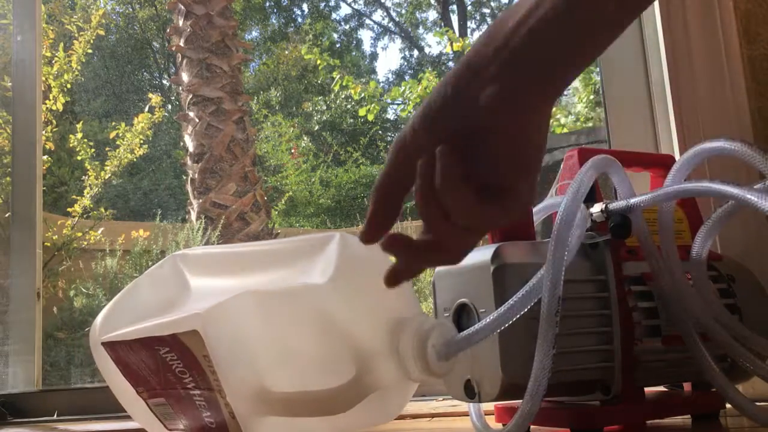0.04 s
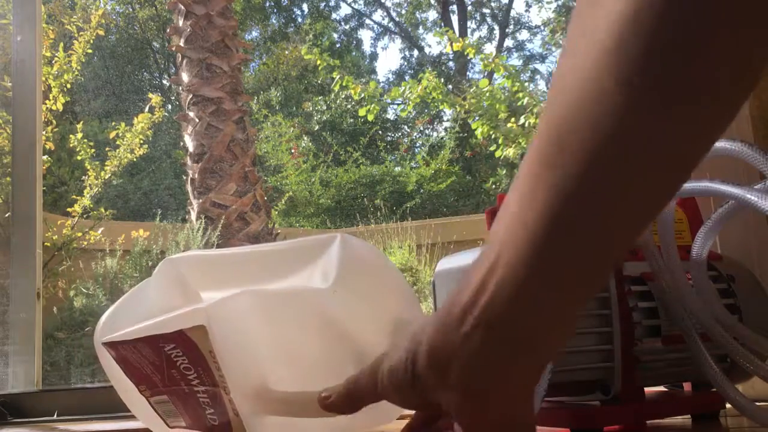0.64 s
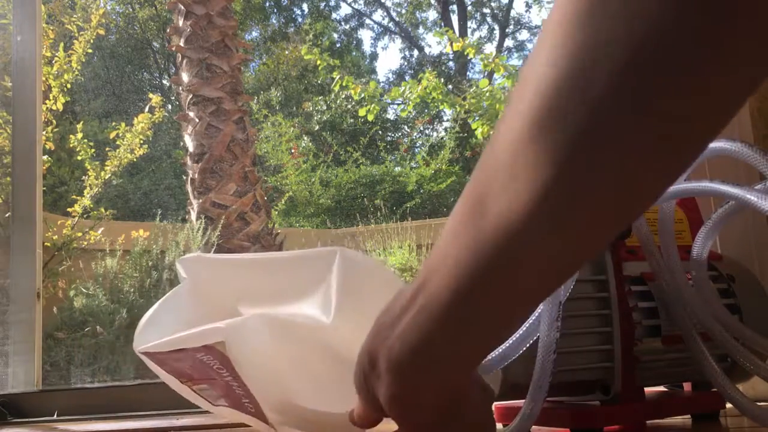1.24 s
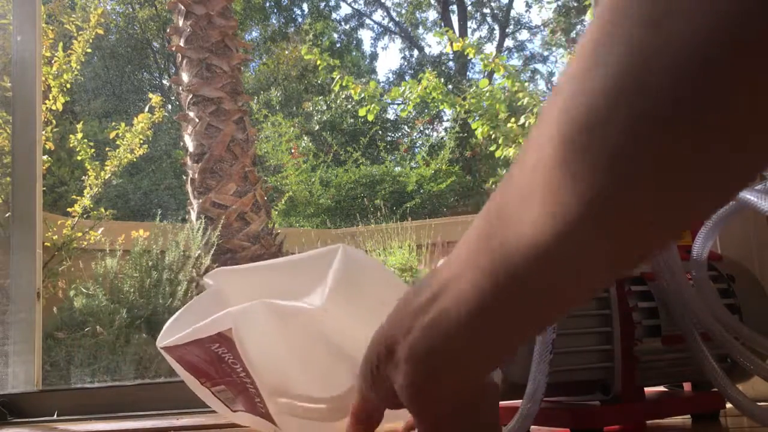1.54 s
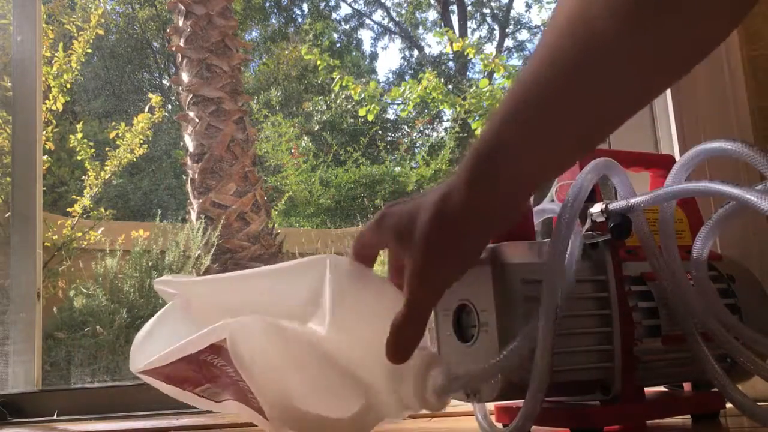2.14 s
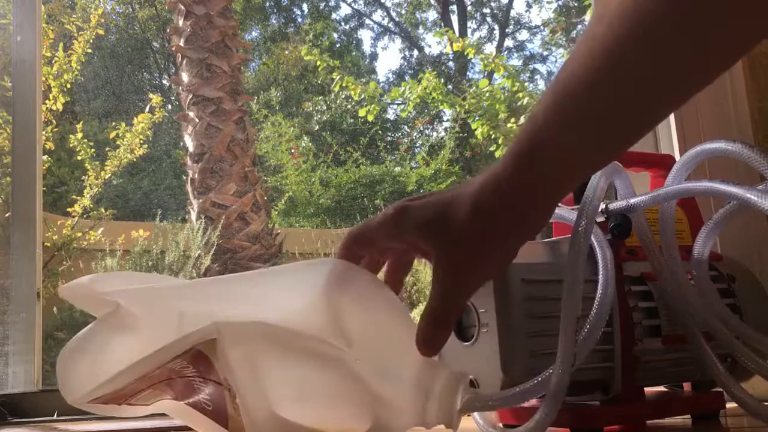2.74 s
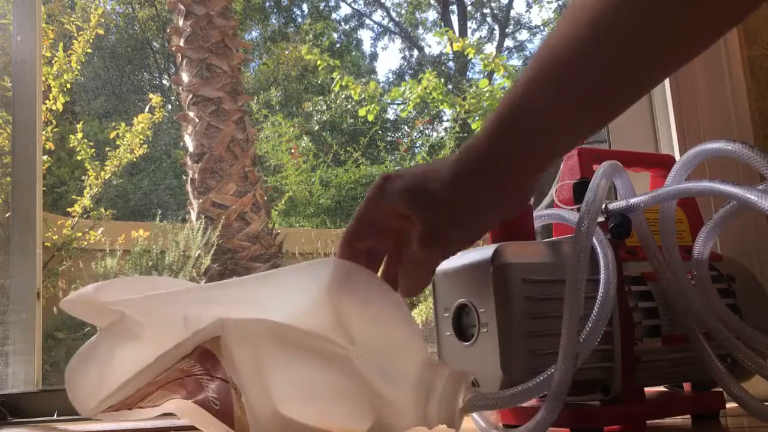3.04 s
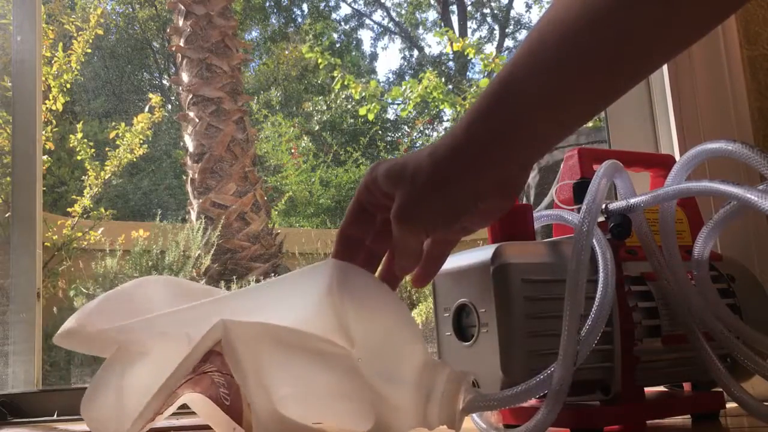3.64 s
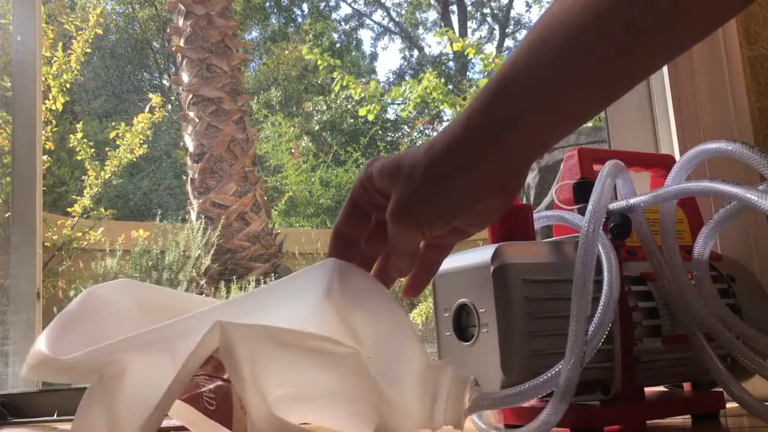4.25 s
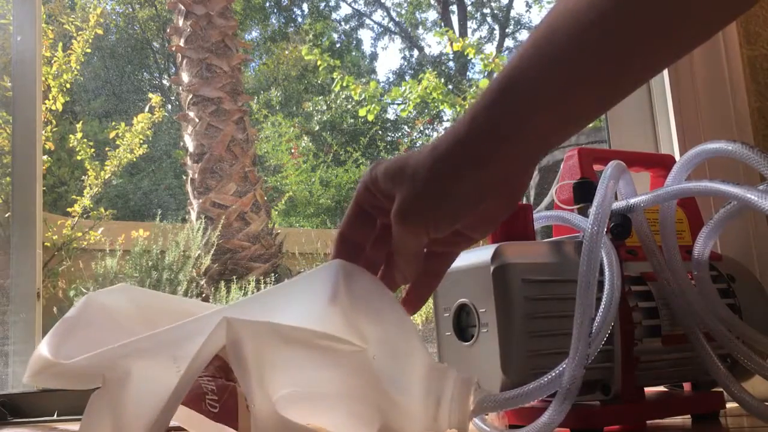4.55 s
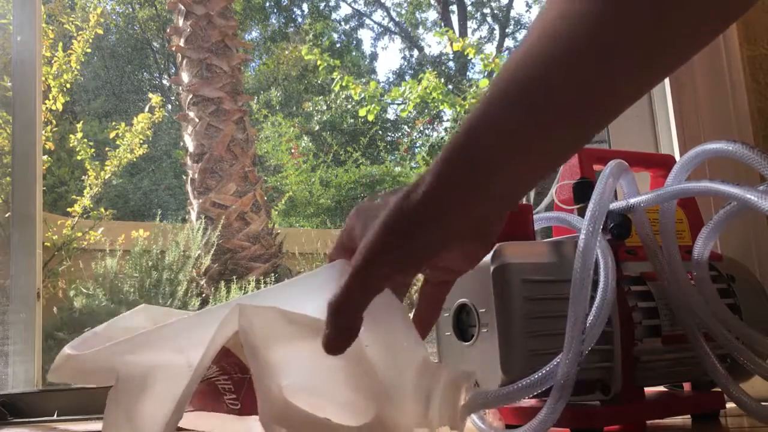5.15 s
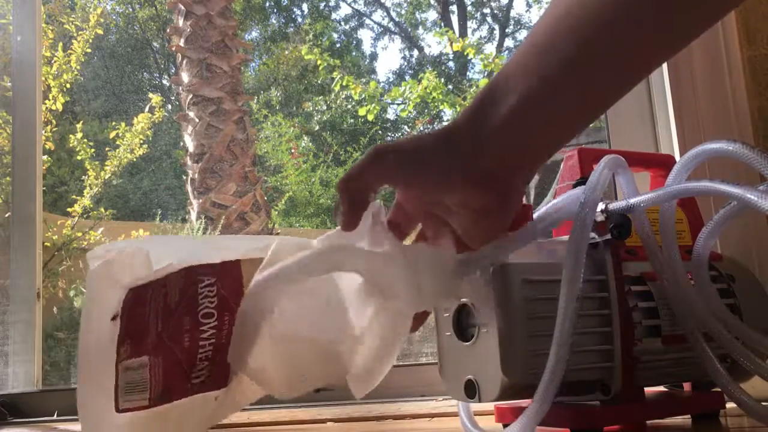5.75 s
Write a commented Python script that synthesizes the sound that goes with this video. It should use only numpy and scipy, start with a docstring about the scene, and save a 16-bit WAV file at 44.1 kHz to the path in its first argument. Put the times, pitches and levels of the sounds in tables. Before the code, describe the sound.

A small vacuum pump drones and rattles steadily while a plastic jug buckles with hollow pops.

```python
"""A steady, rattling drone: a piston vacuum pump on a window sill, sucking the air out of a plastic jug.
Each turn of the shaft gives a thump, a knock in the housing, a loose rattle and a puff of hiss.
Beside the pump the jug's walls buckle with hollow pops; as the vacuum builds, a ring overtakes the rattle.
One microphone, with the pump close and dry and a little furnished room around the jug."""
import sys
import numpy as np
from scipy import signal
from scipy.fft import rfft, irfft
from scipy.io import wavfile

SR = 44100
rng = np.random.default_rng(int(sys.argv[2]) if len(sys.argv) > 2 else 0)


def master(y):
    """Save y as 16-bit WAV."""
    cut = np.clip(np.atleast_2d(y).T, -1, 1)
    pcm = np.round(cut * 32767)  # scale
    wavfile.write(sys.argv[1], SR, pcm.astype(np.int16))


N = 264159
T = np.arange(N) / SR

# the jug's walls snapping through: start_s, level_db, pitch_hz, swell_s, crack_db
POPS = [(2.305, -13, 733, .0026, -18), (2.3125, -17.5, 570, .004, -34), (2.332, -25, 297, 0.0052, -37),
        (2.578, -34, 486, 0.0027, -55), (2.6945, -25, 430, 0.0023, -38), (4.0234, -33.5, 507, 0.0042, -57),
        (4.8105, -18, 730, 0.0019, -37), (4.8144, -14.5, 398, 0.0023, -37),
        (5.341, -23.5, 554, 0.0017, -47), (5.379, -21.5, 497, 0.0014, -31),
        (5.4326, -18.5, 590, 0.0012, -37), (5.5135, -10, 885, 0.0012, -46),
        (5.5153, -13.5, 285, 0.0019, -55), (5.96, -3, 446, 0.0024, -34), (5.9624, -14, 170, 0.0021, -50)]


def amp(db):
    """Decibels to gain."""
    return 10 ** (np.asarray(db) / 20)


def unit(x):
    """Scales to rms 1."""
    return x / np.sqrt(np.mean(x ** 2) + 1e-20)


def curve(points):
    """Joins (time_s, value) points by straight lines."""
    return np.interp(T, *np.transpose(points))


def value_at(points, hz):
    """Reads (freq_hz, value) points on a log-frequency axis."""
    freq_hz, value = np.transpose(points)
    return np.interp(np.log(hz + 1), np.log(freq_hz + 1), value)


def add(mix, start_s, sound):
    """Mixes a sound in at start_s."""
    part = mix[round(start_s * SR):][:len(sound)]
    part += sound[:len(part)]


def colour(x, spectrum, size=4096):
    """Causal (minimum-phase) filter with a (freq_hz, gain_db) spectrum."""
    log_gain = np.log(amp(value_at(spectrum, abs(np.fft.fftfreq(size, 1 / SR)))))
    taps = np.fft.ifft(np.exp(np.conj(signal.hilbert(log_gain)))).real
    if np.sum(taps[:size // 2] ** 2) < np.sum(taps[size // 2:] ** 2):
        taps = np.roll(taps[::-1], 1)
    return signal.fftconvolve(x, taps[:size // 2])[:len(x)]


def resonate(x, modes, alternate=False):
    """Rings (pitch_hz, width_hz, level_db) modes, rms 1; alternate flips every other one, as in a pipe."""
    out = 0
    for k, (hz, width_hz, db) in enumerate(modes):
        polarity = -1 if alternate and k % 2 else 1
        out += polarity * amp(db) * unit(signal.lfilter(*signal.iirpeak(hz, hz / width_hz, SR), x))
    return unit(out)


def band(x, lo_hz, hi_hz, order=4):
    """Band-pass."""
    return signal.sosfilt(signal.butter(order, [lo_hz, hi_hz], "band", fs=SR, output="sos"), x)


def wander(hz):
    """Random drift up to about hz, rms 1."""
    rolloff = np.exp(-(np.fft.rfftfreq(N, 1 / SR) / hz) ** 2)
    return unit(irfft(rfft(rng.standard_normal(N)) * rolloff, N))


def loaded(db, change_db, midpoint_s=4.715, rise_s=0.22):
    """A level that moves by change_db along an S-curve as the vacuum takes hold in the flattened jug."""
    return db + change_db / (1 + np.exp((midpoint_s - T) / rise_s))


def strikes(turns, angle, jitter_s, uneven_db):
    """One click a turn at a crank angle (in turns), uneven in time and force."""
    due_s = np.interp(np.arange(int(turns[-1])) + angle, turns, T)
    late, hard = rng.standard_normal((len(due_s), 2)).T
    place = np.clip((due_s + jitter_s * late) * SR, 0, N - 2)
    force = amp(uneven_db * hard)
    out = np.zeros(N)
    np.add.at(out, place.astype(int), force * (1 - place % 1))
    np.add.at(out, place.astype(int) + 1, force * (place % 1))
    return out


def puffs(turns, angle, rise, fall, leak):
    """Noise let through once a turn over a steady leak; angle, rise and fall are in turns."""
    age = (turns - angle) % 1
    gate = (1 - np.exp(-age / rise)) * np.exp(-age / fall)
    return unit((leak + unit(gate)) * rng.standard_normal(N))


def room(x):
    """Short diffuse tail of a furnished room, each band dying at its own speed."""
    # reverberation time: freq_hz, t60_s
    decay = [(100, 1), (500, 0.55), (2000, 0.16), (10000, 0.18)]
    hz, t, noise = signal.stft(rng.standard_normal(SR // 2), SR, nperseg=256)
    tail = signal.istft(noise * amp(-60 * t / value_at(decay, hz)[:, None]), SR)[1]
    tail *= 1 - np.exp(-(T[:len(tail)] / 0.013) ** 2)
    return signal.fftconvolve(x, tail / np.linalg.norm(tail))[:N]


def whistle(turns, fade_db_per_s=2.7):
    """The air line's thin whistle, fed by every stroke, fades as the jug empties."""
    air = puffs(turns, angle=0.87, rise=0.2, fall=0.37, leak=0.5)
    tone = unit(band(resonate(air, [(5365, 12, 0)]), 5250, 5480, order=2))
    return amp(-52.5 - fade_db_per_s * T) * tone


def shell(t):
    """The jug's shell rings down, slightly retuned by every change of shape."""
    # modes of the shell: pitch_hz, level_db, t60_s
    modes = [(158, -3.5, 0.069), (278, -27, 0.014), (372, -4.5, 0.12), (457, -2.5, 0.14), (532, -1, 0.16),
             (640, 4.5, 0.079), (726, -4, 0.084), (841, 4.5, 0.085), (945, 0, 0.1), (1110, -7, 0.033),
             (1505, 4.5, 0.024)]
    out = 0
    for hz, db, t60_s in modes:
        retuned_hz = hz * (1 + 0.014 * rng.standard_normal())
        out += amp(db - 60 * t / t60_s) * np.sin(2 * np.pi * (retuned_hz * t + rng.random()))
    return out


def creaks(slips_per_s=70):
    """Faint random slips of the creases ring the shell from the first buckle on."""
    buckled = T > POPS[0][0]
    slips = (rng.random(N) < slips_per_s / SR) * rng.standard_normal(N) * buckled
    return amp(-52) * unit(signal.fftconvolve(slips, shell(T[:SR // 4]))[:N])


def pop(start_s, level_db, pitch_hz, swell_s, crack_db):
    """A wall snaps through: its pitch sinks as it goes slack, the shell rings, the crease cracks."""
    # spectrum of the crack: freq_hz, gain_db
    crack_colour = [(300, -28), (1400, 8), (1800, -1), (2300, -1), (3300, -3), (4600, -19), (15000, -27)]
    grip_s, grip_db_per_s = 4.46, 16.5  # a hand closes on the jug and damps the shell more and more
    t = T[:SR // 4]
    age = t / swell_s
    glide_octaves = 1.3 * (0.0011 / swell_s) ** 2  # quicker snaps sink further
    sinking_hz = pitch_hz * 2 ** (glide_octaves * (np.exp(-age / 2) - 0.5))
    panel = age ** 2 * np.exp(2 * (1 - age)) * np.sin(2 * np.pi * np.cumsum(sinking_hz) / SR)
    crack = unit(colour(rng.standard_normal(len(t)), crack_colour)) * np.exp(-t / 0.0023)
    ring = shell(t) * (1 - np.exp(-t / 0.00046))
    ring_db = level_db - 7 - grip_db_per_s * max(start_s - grip_s, 0)
    return amp(level_db) * panel + amp(ring_db) * ring + amp(crack_db) * crack


def jug():
    """Hollow pops and small bright ticks of the collapsing plastic."""
    # creases ticking: start_s, level_db
    ticks = [(4.7297, -19.5), (5.409, -24)]
    # spectrum of a tick: freq_hz, gain_db
    tick_colour = [(1000, -25), (4000, -9), (8000, 4), (10000, 1), (12500, -5), (16000, 2.5)]
    out, t = np.zeros(N), T[:SR // 20]
    for start_s, *snap in POPS:
        add(out, start_s, pop(start_s, *snap))
    for start_s, db in ticks:
        tick = unit(colour(rng.standard_normal(len(t)), tick_colour)) * np.exp(-t / 0.002)
        add(out, start_s, amp(db) * tick)
    return out


def exhaust(turns):
    """Each stroke slaps the valve and drives a puff of air through the whistling port."""
    # the port's lower and upper resonances: pitch_hz, width_hz, level_db
    low_modes = [(3687, 35, -8), (3875, 28, -19), (4400, 42, -8.5), (4560, 42, -13.5), (4880, 40, -20.5),
                 (5120, 40, -25), (5650, 70, -7), (5766, 76, -4), (5970, 62, 5.5), (6200, 76, -6.5),
                 (6487, 52, 7), (6700, 40, -10), (6840, 47, -2.5), (7010, 49, 4), (7186, 77, 5.5)]
    top_modes = [(7790, 140, 4.5), (7940, 55, -2.5), (8250, 130, -7), (8470, 100, 0), (8670, 100, -1)]
    # an arm or the lifted jug passes between exhaust and microphone: centre_s, half_length_s, top_loss_db
    shadows = [(0.653, 0.35, 10), (1.65, 0.32, 8.5), (5.65, 0.13, 2)]
    # extra hard puffs: centre_s, boost_db
    spurts = [(.091, 7), (1.073, 3.5), (2.383, 7.5), (2.868, 6.5), (5.14, 5.5), (5.885, 4)]
    shade_db = sum(db * np.exp(-((T - s) / half_s) ** 2) for s, half_s, db in shadows)
    spurt_db = sum(db * np.exp(-((T - s) / 0.0081) ** 2) for s, db in spurts)
    air = puffs(turns, angle=0.66, rise=0.22, fall=0.3, leak=0.3) * amp(1.58 * wander(46) + spurt_db)
    # the valve strikes at the same angle every turn, so the hiss carries a comb of fine lines
    valve = unit(strikes(turns, angle=0.8, jitter_s=0, uneven_db=2.8))
    drive = air + 0.35 * valve
    low = unit(band(resonate(drive, low_modes, alternate=True), 3970, 8400, order=5))
    top = unit(band(resonate(drive, top_modes, alternate=True), 7500, 10500, order=3))
    return amp(loaded(-35.5, 0.55) - 0.12 * shade_db) * low + amp(loaded(-44.5, 1) - shade_db) * top


def rush(turns):
    """Broad rush of air and bearings, pulsing with the shaft."""
    # spectrum of the rush: freq_hz, gain_db
    spectrum = [(20, -13), (70, 1), (130, 3), (220, 5.5), (340, -5), (550, -1.5), (750, -2.5), (1500, 13),
                (2400, -13), (3500, -14), (9000, -11), (10400, -20.5), (10900, -15.5), (15800, -22.5)]
    return amp(-40) * unit(colour(puffs(turns, angle=0.59, rise=0.1, fall=0.3, leak=0.95), spectrum))


def valve_spit(turns):
    """The valve spits faintly in the top treble, harder on stray strokes."""
    # resonances of the spit: pitch_hz, width_hz, level_db
    modes = [(11200, 400, -4), (12700, 600, -2), (14400, 900, -9)]
    air = puffs(turns, angle=0.11, rise=0.03, fall=0.071, leak=0.1) * amp(5 * wander(40))
    return amp(-67) * resonate(air, modes)


def motor(turns):
    """Thump of the piston, the sill buzzing under it, and the motor's thin whine."""
    # partials of each of the three: cycles_per_turn, level_db
    thump_partials = [(1, -38), (2, -34.5)]
    buzz_partials = [(3, -42), (4, -37.5), (6, -51), (8, -53)]
    whine_partials = [(5, -48.5), (7, -63), (8.27, -57.5), (9, -57.5), (10.34, -60), (10.88, -56),
                      (12, -61.5), (13, -61), (14.48, -49), (15, -39.5), (15.5, -51), (17.05, -44.5),
                      (17.5, -66), (19.14, -47), (27, -50), (75.6, -65)]
    # the sill's strongest partial, easing after the jug first buckles: time_s, level_db
    buzz_level = [(0, -39.5), (1.95, -38), (2.8, -41), (4.9, -46), (6, -44)]
    buzz_db = curve(buzz_level) - max(db for k, db in buzz_partials)
    tilt_db = loaded(-0.7, -2.5)  # the vacuum softens the thump's overtone
    thump = buzz = whine = 0
    for k, db in thump_partials:
        gain = amp(db + 0.33 * wander(20) + tilt_db * (k - 1))
        thump += gain * np.cos(2 * np.pi * k * (turns + 0.066))
    for k, db in buzz_partials:
        gain = amp(db + 0.5 * wander(14) + buzz_db)
        buzz += gain * np.cos(2 * np.pi * k * (turns + 0.097 - 0.0086 * k))
    for k, db in whine_partials:
        whine += amp(db + wander(4.4)) * np.cos(2 * np.pi * (k * turns + rng.random()))
    return np.sqrt(2) * (thump + buzz + whine)


def loose_parts(turns, mains_hz=60):
    """Loose parts strike and bounce after each knock; their rattle eases under vacuum."""
    # lower and upper resonances of the parts: pitch_hz, width_hz, level_db
    rattle_modes = [(1090, 120, -14), (1220, 88, 3), (1292, 41, 15), (1299, 35, -1), (1399, 23, 6.5),
                    (1610, 70, -1)]
    chatter_modes = [(1890, 47, -1), (2092, 57, 1.5), (2490, 430, -2), (3020, 58, -11.5)]
    # the shaft slips against the mains field, so the parts throb about four and eight times a second
    slip = 4 * np.pi * (mains_hz * T - turns)
    throb = amp(1.3 * np.cos(slip + 2.5) + 1.8 * np.cos(2 * slip - 2.2))
    hits = unit(strikes(turns + 0.02 * np.sin(slip), angle=1.0, jitter_s=0.000505, uneven_db=4.0))
    bounces = unit(strikes(turns, angle=0.199, jitter_s=0.001945, uneven_db=2.5))
    grit = puffs(turns, angle=0.84, rise=0.055, fall=0.77, leak=0.52)
    shake = throb * (hits + 0.5 * bounces + 1.05 * grit)
    rattle = unit(band(resonate(shake, rattle_modes), 977, 1610, order=5))
    fizz = puffs(turns, angle=0.74, rise=0.081, fall=0.35, leak=0.32)
    chatter = unit(band(resonate(shake + fizz, chatter_modes), 1400, 3230, order=3))
    return amp(loaded(-34, -4.5)) * rattle + amp(-51.5) * chatter


def piston(turns):
    """The piston knocks in its housing once a turn, with a ring that grows with the vacuum."""
    # the housing's response: freq_hz, gain_db
    housing = [(250, -59.5), (500, -21), (800, -30), (930, -16.5), (1000, -10), (1045, 1), (1110, 3.5),
               (1210, 6.5), (1290, -13.5), (1390, -1.5), (1500, -17.5), (1620, -7.5), (1800, -18),
               (2300, -44)]
    # resonances of the ring: pitch_hz, width_hz, level_db
    ring_modes = [(1273.5, 18, 1), (1368, 23, -6), (1570, 89, -11.5)]
    knock = unit(colour(strikes(turns, angle=0.82, jitter_s=0.00003, uneven_db=1.96), housing))
    even_hits = strikes(turns, angle=0.8, jitter_s=0.00002, uneven_db=-0.5)
    ring = resonate(band(even_hits, 913, 1560), ring_modes)
    return amp(loaded(-33, 0.5)) * knock + amp(loaded(-44.5, 17.2)) * ring


def scene():
    """One shaft drives all the pump's sounds; the jug pops beside it and stirs the room."""
    # shaft speed: time_s, turns_per_s
    speed = [(0.0, 57.94), (1.3, 57.97), (2.6, 58.01), (3.9, 58.02), (4.5, 57.95), (5.2, 57.88),
             (6.0, 57.68)]
    turns = np.cumsum(curve(speed)) / SR - 0.161
    plastic = jug() + creaks()
    machine = motor(turns) + piston(turns) + loose_parts(turns)
    air = exhaust(turns) + rush(turns) + valve_spit(turns) + whistle(turns)
    return (machine + air + plastic + amp(-14.5) * room(plastic))[None]


def record(dry, edge_hz=15900):
    """The microphone's channel cuts off steeply above edge_hz."""
    lowpass = signal.firwin(511, edge_hz, window=("kaiser", 9), fs=SR)
    return signal.oaconvolve(dry, lowpass[None], "same")


dry = scene()
out = record(dry)
master(out)
```